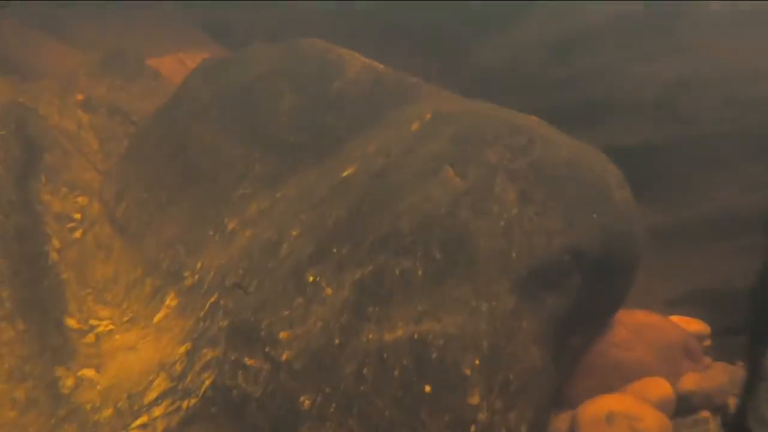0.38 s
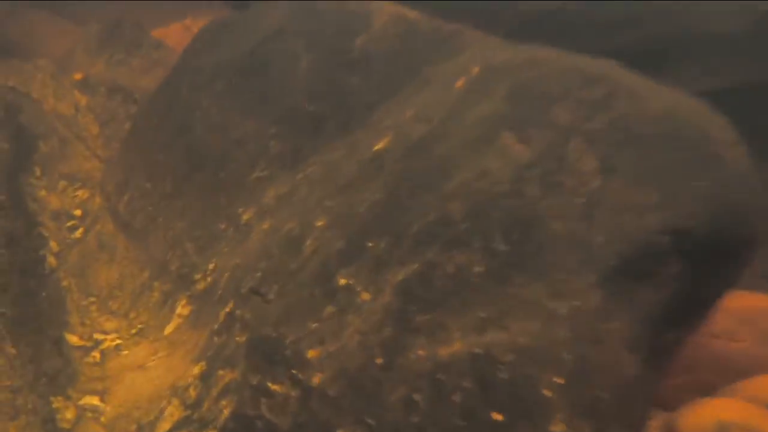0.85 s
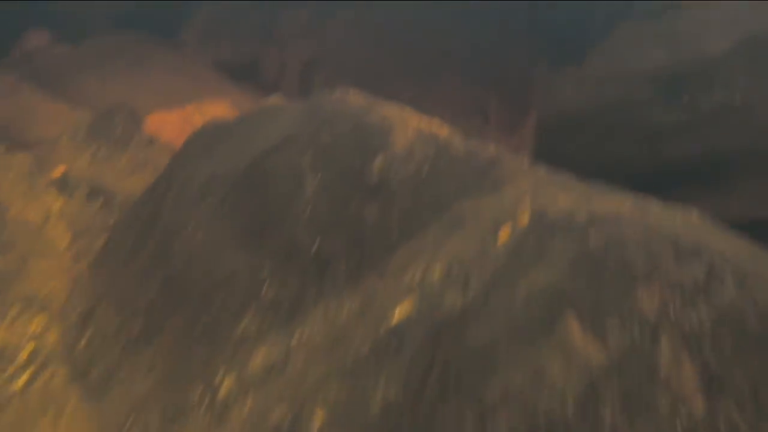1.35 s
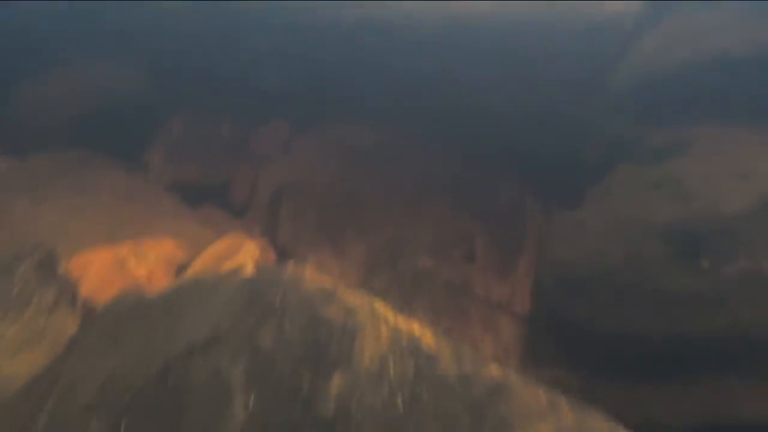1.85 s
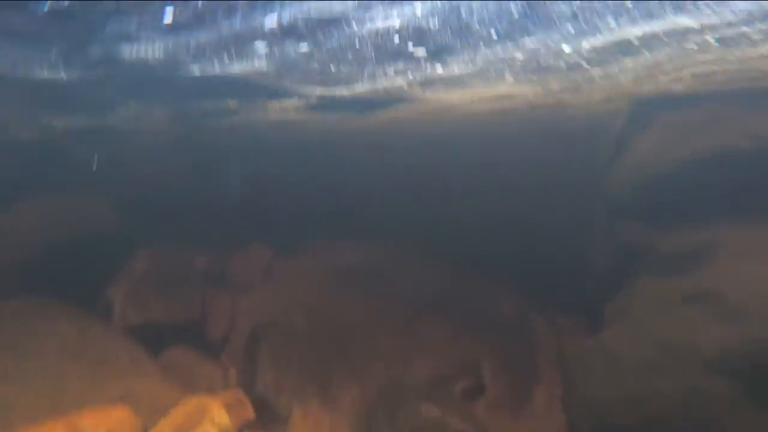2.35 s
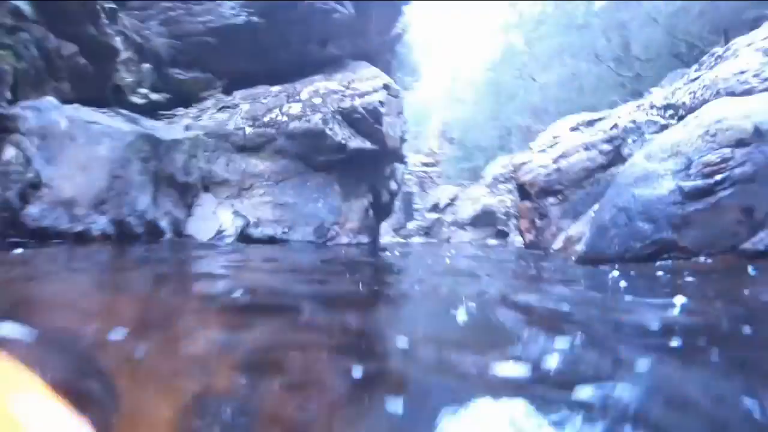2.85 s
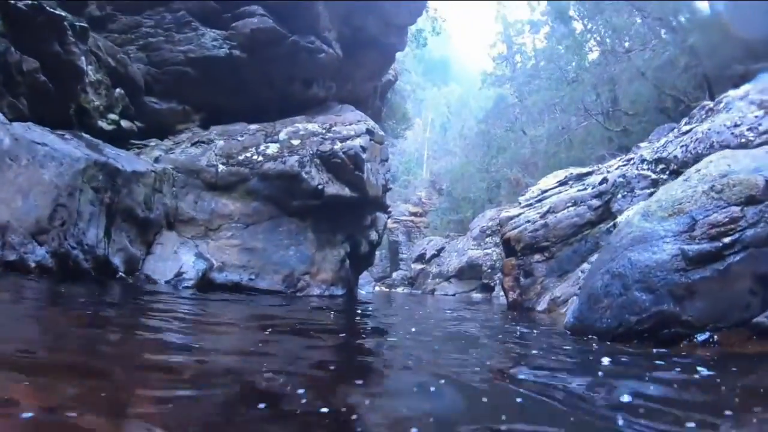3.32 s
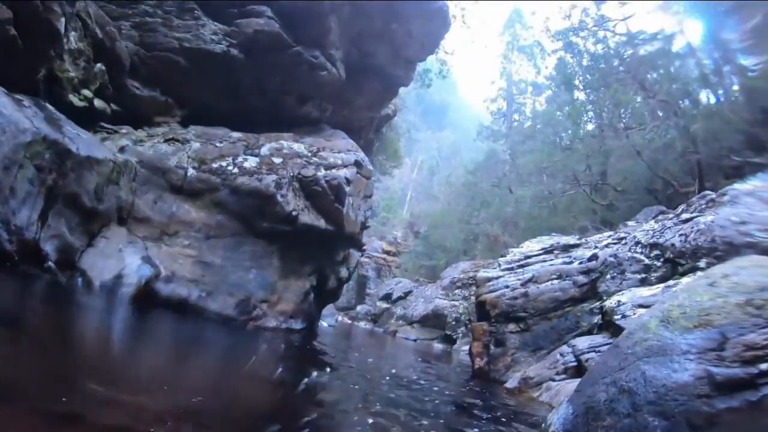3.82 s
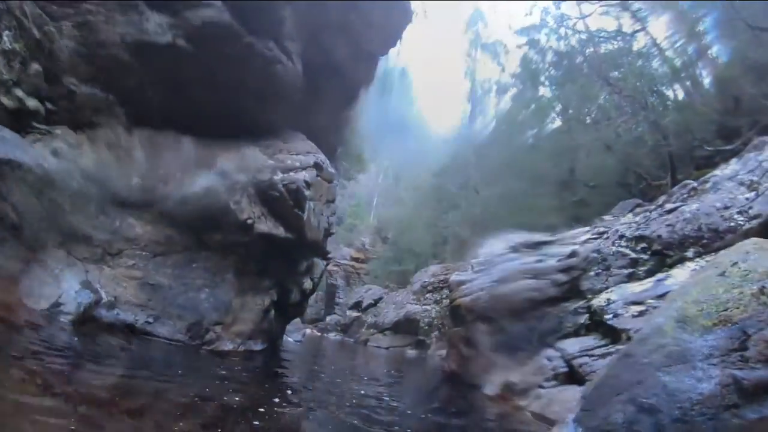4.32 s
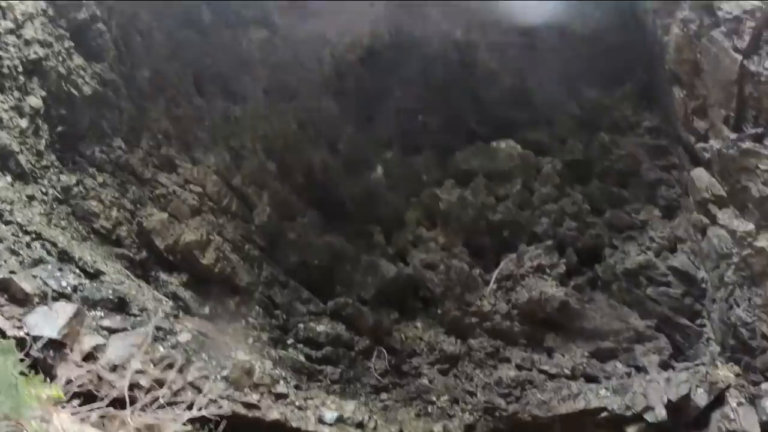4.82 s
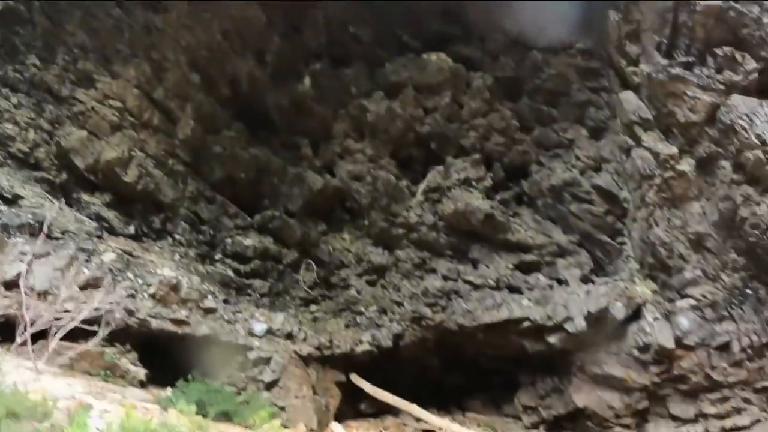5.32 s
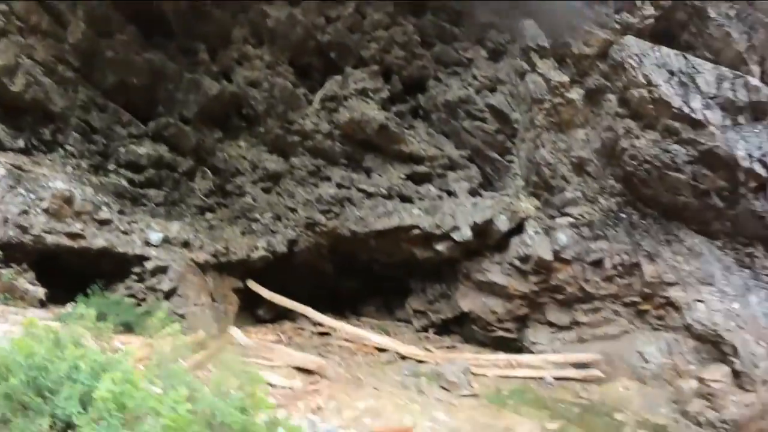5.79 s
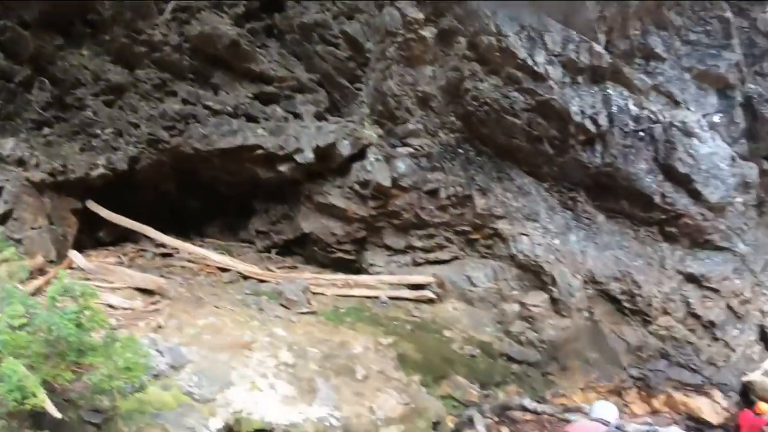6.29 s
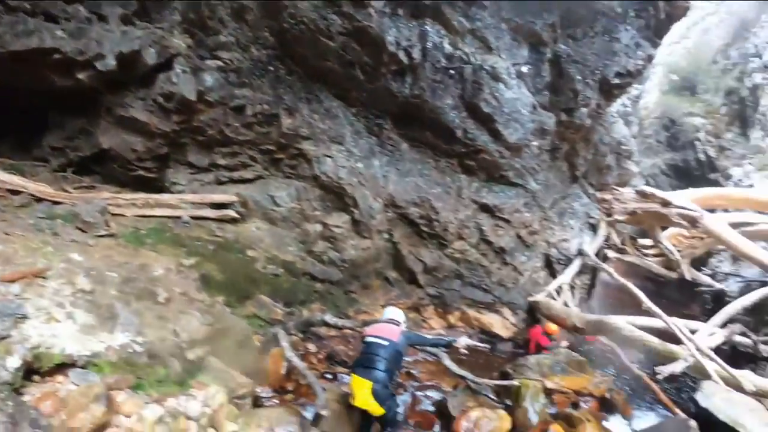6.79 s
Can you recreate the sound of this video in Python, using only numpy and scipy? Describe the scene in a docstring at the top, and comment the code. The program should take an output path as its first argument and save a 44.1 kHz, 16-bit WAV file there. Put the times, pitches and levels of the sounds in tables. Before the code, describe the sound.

Close on a small waterproof case in a rocky stream. It opens with sharp watery slaps, then a dull, quiet underwater murmur with rumble, bubbles, ticks and clusters of hollow knocks and thumps. Around three seconds it breaks the surface with very loud slaps and bright gurgles. A thin, wet wash follows, then heavy low jolts, and the sound clears into a smooth, steady gorge roar with hiss.

```python
"""Stream water rushes past a small waterproof camera that is carried along a rocky bed and lifted clear.
Shaped noise and tiny damped sines make the flow: lumpy under water, a smooth roar in the gorge
once the microphone ports drain. Short bursts, cracks and rattles are water slapping the case; damped
tones are trapped air gurgling, short ticks and the case jolting. Noise rumbles below."""
import sys
import numpy as np
from scipy import signal
from scipy.fft import rfft, irfft, next_fast_len
from scipy.io import wavfile
from scipy.ndimage import uniform_filter1d, minimum_filter1d, map_coordinates

SR = 44100
rng = np.random.default_rng(int(sys.argv[2]) if len(sys.argv) > 2 else 0)


def volts_from_decibels(level):
    """Turn decibel levels (scalar or array-like) into linear amplitude factors."""
    exponent = np.asarray(level, float) / 20
    return 10 ** exponent


def unload_wav(signal):
    """Save mono or channel-first audio to the path in sys.argv[1] as 16-bit WAV at rate SR, clipped to [-1, 1]."""
    wavfile.write(
        sys.argv[1],
        SR,
        np.round(np.clip(np.atleast_2d(signal).T, -1, 1) * 32767).astype(np.int16),
    )


N = 304730  # length [samples]


def unit(x):
    """Scaled to rms 1."""
    return x / np.sqrt(np.mean(x ** 2) + 1e-20)


def along(points, hz):
    """Columns of (frequency [Hz], value, ..) points on a log frequency axis."""
    f, *cols = np.transpose(points)
    return np.squeeze([np.interp(np.log(hz + 1), np.log(f + 1), c) for c in cols])


def curves(rows):
    """One value per sample for each column after the time."""
    s, *cols = np.transpose(rows)
    return [np.interp(np.arange(N) / SR, s, c) for c in cols]


def wobble(rate):
    """A smooth random curve through rate knots a second."""
    return map_coordinates(rng.standard_normal(N // 200), [np.arange(N) * rate / SR])


def filtered(x, response):
    """x times a complex response of frequency."""
    m = next_fast_len(x.shape[-1] + 8192)
    spectrum = rfft(x, m) * response(np.fft.rfftfreq(m, 1 / SR))
    return irfft(spectrum, m)[..., :x.shape[-1]]


def coloured(x, spectrum):
    """x through a spectrum, at rms 1."""
    return unit(filtered(x, lambda hz: volts_from_decibels(along(spectrum, hz))))


def patchy(depth_db):
    """Two unrelated noises that share patches of random gain in time and frequency."""
    z = signal.stft(rng.standard_normal((2, N)), nperseg=256)[2]
    field = uniform_filter1d(rng.standard_normal(z.shape[1:]), size=4, axis=0)
    field = uniform_filter1d(field, size=6, axis=1)
    return signal.istft(z * volts_from_decibels(depth_db * unit(field)), nperseg=256)[1][:, :N]


def grains(count, spread_db, cycles, hz):
    """Tiny damped sines of random pitch at random times, a few much louder."""
    when, size, pitch, turn = rng.random((count, 4)).T[:, :, None]
    t = np.arange(300) / SR
    f = hz * 2 ** (2.6 * (pitch - .5))  # 2.6 octaves around hz
    level = volts_from_decibels(-spread_db * np.log(size + 0.024))
    wave = level * np.exp(-t * f / cycles) * (1 - np.exp(-t * f))
    at = ((when * N).astype(int) + np.arange(len(t))).ravel()
    rows = []
    for phase in (0, turn):
        tones = wave * np.sin(2 * np.pi * (f * t + phase))
        rows.append(np.bincount(at, tones.ravel(), N)[:N])
    return unit(np.array(rows))


def add(out, s, wave):
    """Mixes a two-row wave in at time s."""
    part = out[:, round(s * SR):][:, :wave.shape[1]]
    part += wave[:, :part.shape[1]]


def rings(rows, rise, attack, rough):
    """Damped tones, shaken by turbulence; pitch shifts by 2 * rise of itself over one t60."""
    out, t = np.zeros((2, N)), np.arange(SR // 2) / SR
    for s, db, hz, t60 in rows:
        phase = 2 * np.pi * hz * t * (1 + rise * t / t60) + [[0], [2 * np.pi * rng.random()]]
        knots = rng.standard_normal((2, 1000))
        shake = map_coordinates(knots, [[0 * t, 0 * t + 1], [t * hz * 0.33] * 2], order=3)
        swell = (1 - np.exp(-t / attack)) ** 2
        level = volts_from_decibels(db + 4.5 - 60 * t / t60)  # every ring is lifted by 4.5 dB
        add(out, s, level * swell * (1 + rough * shake[0]) * np.sin(phase + rough * shake[1]))
    return out


def held(start, hold, rise, fall):
    """0 to 1 and back: a straight rise that is full at start, a hold, a straight fall."""
    t = np.arange(N) / SR
    return np.clip(np.minimum(1 + (t - start) / rise, 1 - (t - start - hold) / fall), 0, 1)


def water():
    """Flow noise in four bands; rush and treble crossfade as the ports leave the water and then drain."""
    # how the ports hear the rush: (time [s], share out of the water [0-1], share drained [0-1])
    lift = [(0, 0, 0), (2.9, 0, 0), (3.05, 1, 0), (4.3, 1, .1), (4.62, 1, 1), (6.91, 1, 1)]
    out, dry = np.clip(curves(lift), 0, 1)
    growl_db, rush_db, treble_db = flow(out, dry)
    lumps = (1 - dry) * wobble(23.787)  # water moving over the ports
    mix = volts_from_decibels(rush_db + 1.97 * lumps) * rush(out, dry, rush_db)
    mix += volts_from_decibels(treble_db + 2.6 * lumps) * treble(out, dry)
    mix += volts_from_decibels(growl_db + 2.8 * lumps) * growl()
    return mix + rumble()


def flow(out, dry):
    """Levels in dB of growl, rush and treble: steady for each port state, moved by churns, surges, lulls."""
    # eddies churning round the case: (peak time [s], growl level [dB])
    churns = [(0.02, -38.5), (0.149, -41), (0.751, -40), (0.999, -40.5), (1.301, -40), (1.799, -41.5),
              (2, -37.5), (2.639, -42.5), (3.1, -41), (3.279, -42.5), (4.468, -35.5)]
    # water surging over the ports: (time at full [s], hold [s], rush gain [dB], treble gain [dB])
    surges = [(0.001, 0.013, 12.5, 22), (0.134, 0.01, 18, 12), (0.634, 0.011, 2.5, 13.5),
              (0.777, 0.0071, 26.5, -3), (1.085, 0.74, 1, 7), (1.307, 0.01, 7, 4), (1.905, 0.0062, 7, 21.5),
              (2.544, 0.024, 16.5, -15), (2.797, 0.086, 17, -3.5), (3.08, 0.076, 1.5, 1),
              (3.601, 0.13, 9.5, 3), (3.818, 0.1, 4, 1), (4.035, 0.073, 8, 2.5), (4.425, 0.045, 5, 10.5),
              (4.788, 0.011, 5.5, 4)]
    # rush and treble fall away briefly: (time at full depth [s], hold [s], depth [dB])
    lulls = [(2.02, 0.011, 7.5), (2.282, 0.13, 7.5), (3.257, 0.065, 31.5), (4.146, 0.063, 5)]
    churn_rise, churn_fall = 123, 151.5  # dB per s
    t = np.arange(N) / SR

    def calm(under, wet, drained):
        return under + out * (wet - under) + dry * (drained - wet)

    churn = 0
    for s, db in churns:
        drop_db = np.maximum((s - t) * churn_rise, (t - s) * churn_fall)
        churn = churn + volts_from_decibels(2 * (db - drop_db))  # as power
    growl_db = 10 * np.log10(volts_from_decibels(2 * calm(-55, -55.5, -56)) + churn)

    lull_db = sum(db * held(s, hold, rise=0.036, fall=0.11) for s, hold, db in lulls)
    surge_rise = 0.054 + out * (0.0099 - 0.054)  # s, quicker in air
    surge_fall = 0.054 + out * (0.022 - 0.054)  # s
    surge_db = np.zeros((2, N))
    for s, hold, *gains_db in surges:
        surge_db += np.outer(gains_db, held(s, hold, surge_rise, surge_fall))
    rush_db = calm(-58, -40, -35.5) + surge_db[0] - lull_db
    treble_db = calm(-76, -62.5, -50) + surge_db[1] - lull_db
    return growl_db, rush_db, treble_db


def rush(out, dry, rush_db):
    """Middle band: bubbly murmur below the surface, patchy wash on wet ports, smooth roar once drained."""
    # spectra with the ports sunk, wet and drained: (frequency [Hz], relative level [dB])
    sunk_spectrum = [(250, -56.5), (500, 3), (800, -1.5), (1300, -7.5), (1650, 3.5), (1900, -4.5),
                     (2800, -4.5), (3600, -13.5), (6000, -69.5)]
    wet_spectrum = [(300, -51), (520, -30), (700, -14), (1100, -13), (1450, -6.5), (1900, -12.5),
                    (2400, -15), (3200, -34.5), (6000, -68.5)]
    drained_spectrum = [(250, -18), (550, -19.5), (750, -14), (1050, -12.5), (1400, -3), (1980, 0.5),
                        (2500, -4.5), (3300, -16), (4200, -63), (6000, -84.5)]
    fizz = grains(count=2500, spread_db=4.0, cycles=29.0, hz=1900)
    # short clicks in the flow, fainter once the ports are wet
    clicks = grains(count=500, spread_db=7.5, cycles=1.6, hz=1900)
    sunk = coloured(1.2 * patchy(4) + fizz + clicks, sunk_spectrum)
    wet = coloured(patchy(5) + 0.25 * (fizz + clicks), wet_spectrum)
    roar = coloured(patchy(1.0), drained_spectrum)
    # the same wash heard below the surface
    dull = unit(filtered(wet, lambda hz: 1 / (1 + (hz / 1100) ** 3)))
    surge = np.clip((rush_db + 58) / 9, 0, 1)  # strong flow drowns the quiet murmur
    below = np.sqrt(1 - surge) * sunk + np.sqrt(surge) * dull
    return np.sqrt(1 - out) * below + np.sqrt(out * (1 - dry)) * wet + np.sqrt(out * dry) * roar


def treble(out, dry):
    """High band: patchy noise with short ticking grains, giving way to smooth hiss once drained."""
    # spectra with the ports sunk, wet and drained: (frequency [Hz], relative level [dB])
    sunk_spectrum = [(2800, -13), (3600, -6), (4900, -8), (5900, -1.5), (7400, -14), (10000, -12.5),
                     (17000, -68)]
    wet_spectrum = [(2800, -19), (3600, 1.5), (4400, 1.5), (5800, -6.5), (7200, -8.5), (10000, -14.5),
                    (13000, -38), (17000, -100)]
    drained_spectrum = [(2500, -31), (3600, -2.5), (4500, -3.5), (6500, -8), (7500, -15), (9800, -18),
                        (11500, -33.5), (15000, -32.5), (17000, -100)]
    spray = patchy(6) + grains(count=2600, spread_db=8.0, cycles=1.2, hz=5600)
    sizzle = np.sqrt(1 - out) * coloured(spray, sunk_spectrum)
    fizz = np.sqrt(out * (1 - dry)) * coloured(spray, wet_spectrum)
    hiss = np.sqrt(dry) * coloured(patchy(1.0), drained_spectrum)
    return sizzle + fizz + hiss


def growl():
    """Low band of eddies churning round the case: lightly patchy noise at rms 1."""
    # (frequency [Hz], relative level [dB])
    growl_spectrum = [(50, -35.5), (110, 1), (190, 5), (280, -4.5), (450, -10.5), (700, -54.5),
                      (1500, -120)]
    return coloured(patchy(1.5), growl_spectrum)


def rumble():
    """Lowest band: noise that follows how hard the moving camera drags the water."""
    # (frequency [Hz], relative level [dB])
    rumble_spectrum = [(8, -16), (20, 7.5), (40, -3), (65, -9), (90, -28), (130, -31.5), (300, -120)]
    # (time [s], rumble level [dB])
    drag = [(0, -22.5), (0.35, -30), (0.75, -19.5), (1, -27.5), (2, -25), (2.4, -30), (3.25, -26.5),
            (3.55, -33), (3.7, -25), (3.95, -25.5), (4.15, -23), (4.47, -29.5), (4.62, -30.5), (5.6, -31.5),
            (6.2, -37), (6.91, -30)]
    rumble_db, = curves(drag)
    return volts_from_decibels(rumble_db + 1.8 * wobble(12)) * coloured(patchy(.4), rumble_spectrum)


def case_response(f):
    """Case resonances in alternating polarity; water damps the highs."""
    # (frequency [Hz], width [Hz], level [dB])
    modes = [(813, 437, 0.5), (1140, 250, 6.5), (1660, 285, 6), (2280, 660, -8.5)]
    total = 0
    for k, (centre, width, db) in enumerate(modes):
        damping = 1j * f * width
        total = total + (-1) ** k * volts_from_decibels(db) * damping / (centre * centre - f * f + damping)
    return total / (1 + 1j * f / 3300) ** 5


def slaps():
    """Water slapping the case: a few cycles in the port, a bright crack, then a noisy rattle of the case."""
    # crack and rattle levels are relative to the slap, ahead of their fixed boosts below:
    # (time [s], slap level [dB], ring [Hz], crack level [dB], rattle level [dB])
    slap_rows = [(0.006, -25.5, 5350, -13, -9), (0.017, -18, 3280, -3.5, -4.5),
                 (0.032, -12.5, 2780, -14.5, -12), (0.272, -23.5, 1900, -35.5, -21.5),
                 (0.308, -29.5, 1780, -32, -18), (0.336, -34.5, 1520, -30, -12.5),
                 (0.717, -25, 738, -45, -15), (0.725, -26, 1124, -30.5, -8), (0.774, -12, 1090, -51.5, -14),
                 (0.944, -33.5, 722, -50, -6.5), (1.331, -15.5, 1860, -58, -22),
                 (1.332, -25.5, 765, -49, 3.5), (1.788, -23, 748, -40, -23),
                 (1.951, -20.5, 714, -54.5, -27), (1.96, -8.5, 960, -35, -5.5),
                 (1.988, -25.5, 1000, -85, -5.5), (1.999, -23.5, 790, -48, -11),
                 (2.07, -25, 1240, -36.5, -13.5), (2.245, -11, 1424, -52, -10.5),
                 (2.478, -13, 1173, -65, -8), (2.512, -18.5, 1190, -64.5, -10),
                 (2.528, -19, 1087, -61.5, -10.5), (2.592, -20.5, 1000, -54, -0.5),
                 (2.659, -35, 1900, -33.5, -12), (2.724, -20, 1030, -73, -18),
                 (2.822, -30.5, 686, -27, -5.5), (2.915, -20.5, 1830, -24, -25.5),
                 (2.929, -24, 3100, -29, -13), (3.004, -21.5, 1120, -33.5, -9),
                 (3.022, -9, 1700, -30.5, -16.5), (3.079, -21.5, 1510, -34.5, -6.5),
                 (3.16, -26, 1430, -24, -2), (3.24, -2.5, 1380, -32, -21.5),
                 (3.278, -11.5, 1102, -58, -8.5), (3.305, -10.5, 1200, -70, -9),
                 (3.609, -17, 1560, -29, -7), (3.677, -18.5, 1385, -48, -9.5),
                 (4.256, -19.5, 1740, -46, -32), (4.419, -20.5, 1350, -10, -11),
                 (4.438, -28.5, 1790, -27.5, -27), (4.467, -11.5, 1660, -22.5, -18),
                 (4.51, -20, 1840, -25, -25), (4.561, -13.5, 1290, -38, -20)]
    # (frequency [Hz], relative level [dB])
    crack_spectrum = [(1500, -10.5), (2800, 4), (5000, -7), (9000, -19.5), (14000, -44), (18000, -100)]
    out, t = np.zeros((2, N)), np.arange(SR // 8) / SR
    for s, db, hz, crack_db, rattle_db in slap_rows:
        u = t * hz / 0.6  # the burst swells over a cycle and dies in about four
        burst = 2.08 * u ** 2 * np.exp(-u) * np.sin(2 * np.pi * (hz * t + rng.random((2, 1))))
        crack = coloured(rng.standard_normal((2, len(t))), crack_spectrum)
        crack *= volts_from_decibels(crack_db + 8.0) * np.exp(-(t / 0.0021 - 1) ** 2)
        # uneven random loudness
        uneven = volts_from_decibels(3.2 * rng.standard_normal(len(t) // 100 + 1)).repeat(100)[:len(t)]
        fade = volts_from_decibels(rattle_db - 60 * t / 0.034) * (1 - np.exp(-t / 0.00063))
        shake = rng.standard_normal((2, len(t))) * uneven / 1.196 * fade
        rattle = 8.94 * filtered(shake, case_response)
        add(out, s, volts_from_decibels(db) * (burst + crack + rattle))
    return out


def gurgle():
    """Trapped air: each bubble rings as a damped tone of slightly climbing pitch."""
    # (time [s], level before the ring lift [dB], starting pitch [Hz], t60 [s])
    bubbles = [(0.094, -27, 1080, 0.089), (0.107, -22.5, 709, 0.074), (0.142, -27.5, 745, 0.14),
               (0.162, -15.5, 1123, 0.018), (0.72, -19, 368, 0.089), (0.742, -16.5, 1110, 0.035),
               (0.75, -27.5, 1665, 0.016), (0.77, -19.5, 301, 0.096), (0.775, -18, 965, 0.04),
               (0.782, -17, 1093, 0.037), (0.842, -20, 372, 0.042), (0.862, -34.5, 513, 0.19),
               (0.865, -31.5, 692, 0.042), (0.945, -27, 514, 0.055), (0.955, -43.5, 714, 0.17),
               (1.11, -37.5, 1780, 0.027), (1.135, -39, 1620, 0.049), (1.19, -34.5, 2820, 0.024),
               (1.19, -50, 376, 0.16), (1.335, -22.5, 733, 0.063), (1.898, -41.5, 3020, 0.046),
               (1.975, -16.5, 730, 0.018), (2.835, -33, 1790, 0.026), (2.907, -21.5, 3130, 0.0073),
               (2.915, -12, 1680, 0.014), (2.929, -16, 3230, 0.017), (3.004, -24.5, 1035, 0.068),
               (3.043, -18, 1400, 0.03), (3.06, -8, 1890, 0.028), (3.093, -22, 1520, 0.042),
               (3.132, -23, 1317, 0.061), (3.144, -14, 2070, 0.017), (3.62, -9, 1590, 0.019),
               (3.646, -13.5, 2210, 0.017)]
    return rings(bubbles, rise=.04, attack=.001, rough=.28)


def gulp():
    """An air pocket swallowed: its pitch falls to zero, then turns back up in the fading tail."""
    # (time [s], level before the ring lift [dB], starting pitch [Hz], t60 [s])
    pockets = [(2.602, -28.5, 315, .22)]
    return rings(pockets, rise=-1.25, attack=.003, rough=.5)


def short_ticks():
    """Short damped ticks, under water and on the wet ports: tones of climbing pitch, shorter when higher."""
    # (time [s], level before the ring lift [dB], starting pitch [Hz])
    tick_rows = [(.143, -45, 5760), (.182, -51, 2000), (.204, -39, 1900), (0.544, -35, 1780),
                 (.986, -37.5, 2880), (1.004, -46, 1103), (1.164, -37, 2050), (1.185, -34.5, 1900),
                 (1.305, -34, 2160), (1.754, -45, 6400), (2.171, -36.5, 902), (2.197, -37, 907),
                 (2.666, -38.5, 5940), (3.546, -31, 1410), (3.598, -34.5, 5000), (3.695, -41, 5400),
                 (3.737, -37, 4370), (3.791, -25, 1900), (3.845, -26, 1900), (4.195, -27.5, 2050)]
    cycles = 19.6  # of the starting pitch, to die by 60 dB
    rows = [(s, db, hz, cycles / hz) for s, db, hz in tick_rows]
    return rings(rows, rise=0.11, attack=0.00022, rough=.4)


def thumps():
    """The case jolts: low damped tones whose pitch sinks a little."""
    # (time [s], level before the ring lift [dB], starting pitch [Hz], t60 [s])
    jolts = [(.715, -21.5, 160.6, 0.079), (.77, -18, 146.4, 0.082), (.84, -29, 207.5, 0.087),
             (1.27, -17, 122.7, 0.085), (1.33, -20.5, 320, 0.036), (1.79, -22.5, 128, 0.16),
             (1.955, -19.5, 233, 0.092), (1.985, -19.5, 64.5, 0.22), (3.022, -25.5, 126.4, 0.053),
             (3.153, -24.5, 105.6, 0.071), (3.3, -19, 150, 0.034), (3.611, -15.5, 54.6, 0.474),
             (3.615, -27, 177, 0.062), (3.665, -21, 62.2, 0.18), (4.418, -11.5, 111, 0.047),
             (4.455, -15.5, 74.6, 0.15), (4.43, -14, 33.55, 0.31), (4.51, -16.5, 77.4, 0.078),
             (4.562, -14, 68, 0.085)]
    return rings(jolts, rise=-0.053, attack=0.00053, rough=0.18)


def scene():
    """Row 0 is what both ports share, row 1 an unrelated twin that feeds their difference."""
    return water() + slaps() + gurgle() + gulp() + short_ticks() + thumps()


def port_pair(dry):
    """Two ports as mid plus and minus a side signal that is partly tied to the mid."""
    # (frequency [Hz], side minus mid [dB], share of side tied to mid [0-1], its phase [rad])
    port_rows = [(60, -22.5, 0.92, -2.5), (400, -16.5, .4, -1.5), (600, -1.5, 0.46, -0.5),
                 (780, 0, 0.89, -1.65), (1000, 4.5, 1, -2.5), (1200, -2.5, 0.9, -2.5),
                 (1870, -7.5, 0.4, -2), (2580, -1, 0.65, -2.5), (3400, -2.5, 0.38, -4.5),
                 (4600, 4, .55, -1.5), (6300, 2, 1, -8), (10000, -1, .3, -1)]

    def pair(hz):
        side_db, tied, turn = along(port_rows, hz)
        tied = np.clip(tied, 0, 1)
        return volts_from_decibels(side_db) * np.array([tied * np.exp(1j * turn), np.sqrt(1 - tied ** 2)])

    side = filtered(dry, pair).sum(axis=0)
    return np.array([dry[0] + side, dry[0] - side])


def limited(ports):
    """A limiter turns both ports down together around peaks above 0.98 of full scale."""
    room = np.minimum(1, .98 / (abs(ports).max(axis=0) + 1e-9))
    gain = uniform_filter1d(minimum_filter1d(room, size=128), size=128)
    return gain * ports


def top_cut(x):
    """Nothing passes above the cut-off."""
    return signal.sosfilt(signal.butter(12, 14900, fs=SR, output="sos"), x)


def record(dry):
    """The port pair hears the scene; a limiter holds down the hardest peaks."""
    mix = limited(port_pair(dry))
    return top_cut(mix)


dry = scene()
out = record(dry)
unload_wav(out)
```